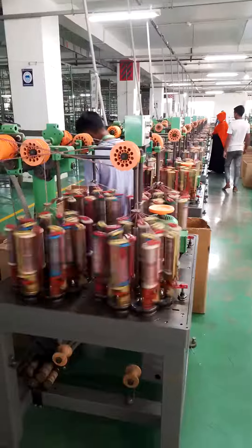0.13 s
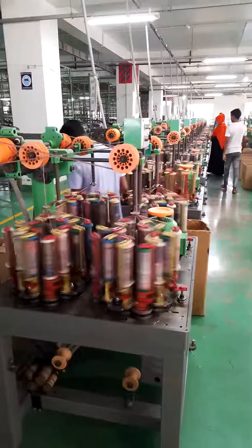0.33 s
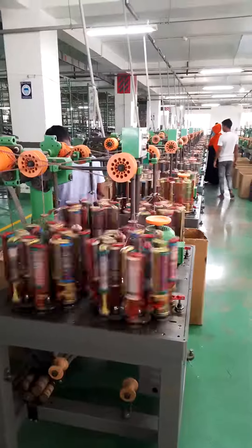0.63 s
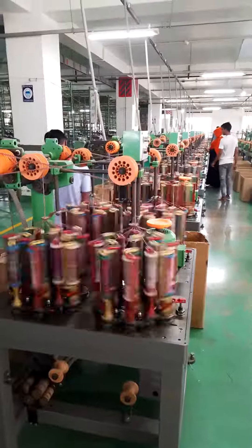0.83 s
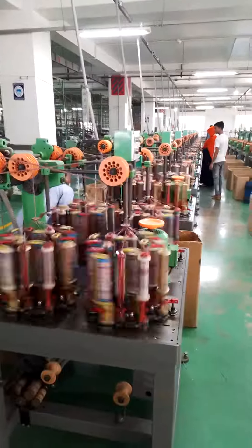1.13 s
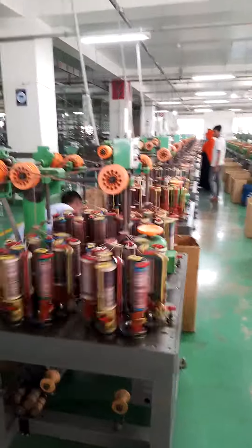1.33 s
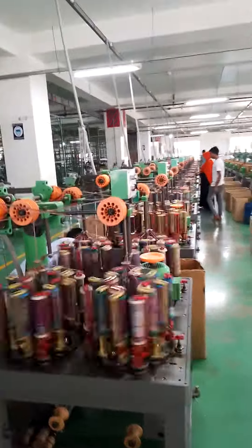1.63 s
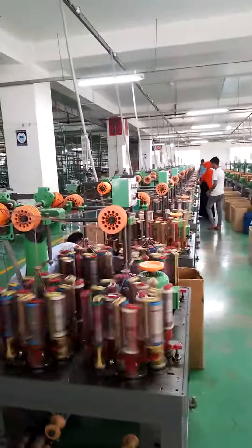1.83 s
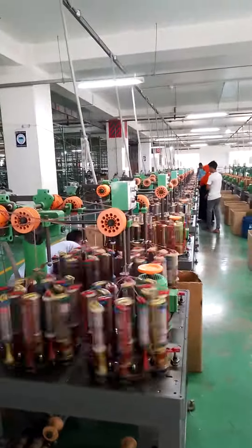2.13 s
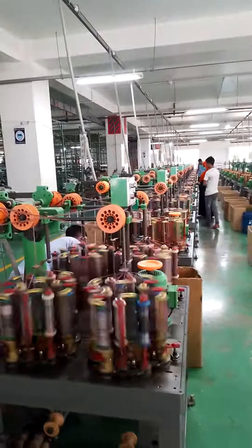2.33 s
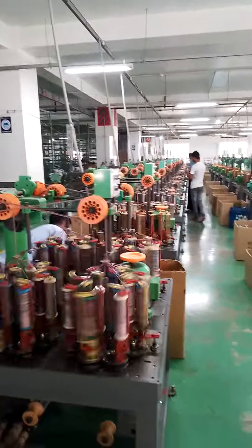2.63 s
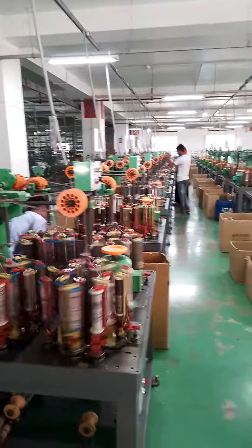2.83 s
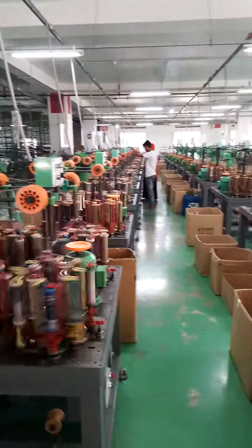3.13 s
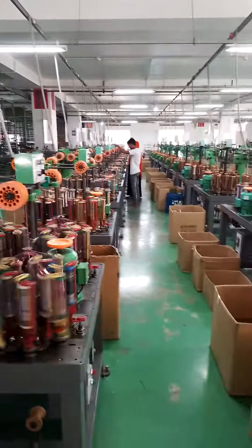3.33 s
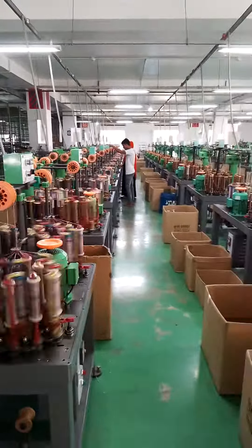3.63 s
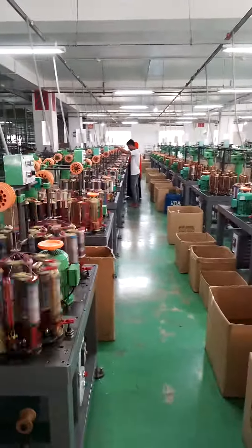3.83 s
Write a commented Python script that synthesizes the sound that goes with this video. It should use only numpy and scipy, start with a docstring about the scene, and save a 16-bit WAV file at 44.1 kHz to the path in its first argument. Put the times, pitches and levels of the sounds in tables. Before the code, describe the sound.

Braiding machines roar in a dense steady clatter across a large factory hall, after brief silence.

```python
"""A long hall full of braiding machines, heard by a phone with two microphone ports.
After a silent start the sound fades in: thousands of bobbin carriers clatter into one dense roar, made
as shaped noise; gear meshes and motors hum in close, beating families of sines; the nearest machine adds
a faint rhythm of short noise clacks, which weakens at about three seconds as the phone turns away."""
import sys
import numpy as np
from scipy import signal
from scipy.fft import rfft, irfft
from scipy.io import wavfile
from scipy.ndimage import uniform_filter1d

SR = 44100
rng = np.random.default_rng(int(sys.argv[2]) if len(sys.argv) > 2 else 0)


def store_pcm(level_fs):
    """Save levels as 16-bit WAV."""
    pcm = np.round(np.clip(level_fs, -1, 1) * 32767).astype(np.int16)
    wavfile.write(sys.argv[1], SR, np.atleast_2d(pcm).T)


def gain_from_decibels(decibels):
    """Convert decibel values to linear amplitude factors."""
    exponent = np.asarray(decibels, float) / 20
    return 10 ** exponent


N = 176400  # samples: 4 s


def read(points, hz):
    """Logarithmic frequency scale: interpolates a table's values along it."""
    f, value = np.transpose(points)
    return np.interp(np.log(hz + 1), np.log(f + 1), value)


def evened(x):
    """Normalization: scales a signal to rms 1."""
    return x / np.sqrt(np.mean(x ** 2) + 1e-20)


def slow(lo_hz, hi_hz, t):
    """Random-phase superposition: 20 sines between two rates make a slow fluctuation of rms 1."""
    f = np.geomspace(lo_hz, hi_hz, num=20)[:, None]
    phase = 2 * np.pi * (f * t + rng.random(f.shape))
    return evened((np.sin(phase) / np.sqrt(f)).sum(0))


# spectrum of the roar before the ports: (frequency [Hz], relative density [dB per Hz])
ROAR_SPECTRUM = [(25, -42), (60, -27), (100, -21), (130, -15), (160, -34.5), (200, -10), (250, -0.5),
                 (310, 5), (450, 4), (700, 1.5), (1000, 0), (1350, -4), (2100, 0), (3000, -5), (4000, -4),
                 (5200, -4), (7000, -5.5), (9000, -6.5), (10500, -6), (12000, -9.5), (13500, -10.5),
                 (15000, -28.5)]
# likeness of the two ports: (frequency [Hz], left-right correlation [-1 to 1])
LIKENESS = [(60, 1), (98, 1), (160, 0.99), (260, 0.85), (430, 0.6), (710, 0.15), (1160, -0.15),
            (1900, 0.016), (3120, 0.0039), (5100, 0.042), (8360, 0.16), (13700, 0.18)]
ROAR_DB = -23  # rms before the ports
PATCH_DB, FLICKER_DB = 0.5, 0.25  # rms level swings


def roar():
    """Diffuse field: the hall blurs all the far machines into partly correlated, slightly flickering noise."""
    frames, hz = N // 512 + 5, np.fft.rfftfreq(2048, 1 / SR)
    a, b, c, d, patches = rng.standard_normal((frames, 1025, 5)).T
    # patches span 24 frequency bins and 6 frames, alike at both ports
    patches = uniform_filter1d(patches, size=24, axis=0)
    patches = evened(uniform_filter1d(patches, size=6, axis=1))
    flicker = slow(4, 30, np.arange(frames) * 512 / SR)
    likeness = np.clip(read(LIKENESS, hz), -1, 1)[:, None]
    left, independent = a + 1j * b, c + 1j * d
    right = likeness * left + np.sqrt(1 - likeness ** 2) * independent
    level_db = read(ROAR_SPECTRUM, hz)[:, None] + PATCH_DB * patches + FLICKER_DB * flicker
    spectrum = np.array([left, right]) * gain_from_decibels(level_db)
    noise = signal.istft(spectrum, nperseg=2048, noverlap=1536)[1][:, :N]
    return gain_from_decibels(ROAR_DB) * evened(noise)


# gear and motor families: fundamental frequencies [Hz]
FUNDAMENTAL_HZ = [299.1, 95.7, 345.5, 347.4, 349.6, 340.8, 294.7, 75.4, 111]
# partials of each family: (rms waver of the fundamental [Hz],
# [(multiple of the fundamental, rms level [dB], left over right [dB], left lead in phase [rad])])
FAMILIES = [(0.25, [(1, -33, -0.5, .1)]), (.4, [(1, -62, -2.5, .1), (2, -57, -4, .1), (4, -42.5, 6, .1),
            (5, -44.5, 1, .3)]), (0.21, [(1, -44, -8, .1), (2, -45.5, -14, 0.41), (3, -51.5, -4, 0.84)]),
            (0.198, [(1, -46, 9, .1), (2, -52.5, -14, 0.55)]), (0.19, [(1, -53.5, 8, .1),
            (2, -43, -4.5, 1.5), (3, -58, 5, 1.1), (4, -49, 2, 1.3)]), (0.18, [(1, -52, .1, .1),
            (2, -52, 8, 0.73)]), (0.18, [(1, -55.5, 5, .1)]), (0.26, [(1, -74, -6, .1)]),
            (1.5, [(1, -66.5, 2, .1)])]
HUM_WOBBLE_DB = 1.3  # rms level swing of each partial


def hums():
    """Harmonic series and beats: each gear or motor family shares a wavering speed; each partial wobbles."""
    t = np.arange(N) / SR
    coarse = np.arange(0, N + 200, 200) / SR  # time grid of the slow changes
    side = np.array([[.5], [-.5]])  # left, right
    out = np.zeros((2, N))
    for fundamental_hz, (waver_hz, partials) in zip(FUNDAMENTAL_HZ, FAMILIES):
        waver = np.interp(t, coarse, slow(0.304, 2.7, coarse))
        turn = 2 * np.pi * np.cumsum(fundamental_hz + waver_hz * waver) / SR
        for multiple, db, pan_db, lead in partials:
            wobble = np.interp(t, coarse, slow(1.5, 10, coarse))
            level_db = db + HUM_WOBBLE_DB * wobble + side * pan_db
            phase = round(multiple) * turn + side * lead + 2 * np.pi * rng.random()
            out += np.sqrt(2) * gain_from_decibels(level_db) * np.sin(phase)
    return out


# the carriers cross four times per horn-gear turn: (relative strength of each crossing [dB])
CROSSINGS = [0, -4, -9, -8]
# spectrum of one clack: (frequency [Hz], relative level [dB])
CLACK_SPECTRUM = [(600, -30), (2000, -7.5), (4000, -1.5), (8000, -4), (14000, -3.5)]
# near machine at each port as the phone turns away: (time [s], left level [dB], right level [dB])
NEAR_LEVEL = [(.4, -33, -35), (1.2, -33, -35), (1.8, -32, -35), (2.4, -32.5, -35), (2.9, -33.5, -34.5),
              (3.2, -38, -36), (4, -38, -36)]
TURNS_PER_S, FIRST_TURN_S = 9.2, -.012
CLACKS_PER_S = 4000  # mean rate at each port
CROSSING_S, CLACK_T60_S = .02, .03  # shower decay to 1/e, clack decay by 60 dB
CLACK_SPREAD_DB = 3.5  # scale of the chance differences between crossings


def carriers():
    """Shot noise: the near machine showers small metal clacks, thrown hardest just after each crossing."""
    t = np.arange(N) / SR
    crossings_per_s = TURNS_PER_S * len(CROSSINGS)
    steps = (t - FIRST_TURN_S) * crossings_per_s
    which = np.floor(steps).astype(int)
    since_s = steps % 1 / crossings_per_s
    luck = rng.uniform(-0.89, 1, which.max() + 2)[which + 1]
    crossing_db = np.array(CROSSINGS)[which % len(CROSSINGS)] + CLACK_SPREAD_DB * luck
    shower = gain_from_decibels(crossing_db) * np.exp(-since_s / CROSSING_S)
    happens = rng.random((2, N)) < CLACKS_PER_S / SR
    hits = happens * rng.standard_normal((2, N)) * shower

    # eight kinds of clack, each a decaying burst of coloured noise
    kind = rng.integers(0, 8, (2, N))
    decay = gain_from_decibels(-60 * np.arange(2048) / SR / CLACK_T60_S)
    colour = gain_from_decibels(read(CLACK_SPECTRUM, np.fft.rfftfreq(2048, 1 / SR)))
    out = np.zeros((2, N))
    for k in range(8):
        clack = irfft(rfft(rng.standard_normal((2, 2048))) * colour) * decay
        out += signal.oaconvolve(hits * (kind == k), clack, axes=1)[:, :N]
    s, left_db, right_db = np.transpose(NEAR_LEVEL)
    level_db = np.array([np.interp(t, s, left_db), np.interp(t, s, right_db)])
    return gain_from_decibels(level_db) * evened(out)


def scene():
    """Superposition: hall roar, hums and the near machine add linearly."""
    return roar() + hums() + carriers()


# microphone ports, left then right: (resonance [Hz], sharpness Q, gain [dB])
PORT_CAVITIES = [(7294, 5.73, 2), (10540, 6.05, 0.5)]
# treble trim of the left channel: (frequency [Hz], gain [dB])
LEFT_TRIM = [(4000, -0.5), (7000, .5), (9500, 0.7), (12000, 1), (13000, 2.5), (14200, 7)]


def through_ports(sound):
    """Cavity resonance: each port is a damped second-order system; a trim raises the left's top treble."""
    hz = np.fft.rfftfreq(N, 1 / SR)
    response = np.array([gain_from_decibels(db) / (1 - (hz / f) ** 2 + 1j * hz / f / sharpness)
                         for f, sharpness, db in PORT_CAVITIES])
    response[0] *= gain_from_decibels(read(LEFT_TRIM, hz))
    return irfft(rfft(sound) * response, N)


# fade-in after silence: (time [s], gain [0 to 1])
FADE_IN = [(.4075, 0), (.409, .04), (.5, .31), (.6, .58), (.675, 1)]


def faded_in(sound):
    """Amplitude envelope: a gain rising from zero multiplies the sound."""
    return sound * np.interp(np.arange(N) / SR, *np.transpose(FADE_IN))


def band_limit(x):
    """A steep low-pass at the top of the band."""
    return signal.sosfilt(signal.butter(12, 14300, fs=SR, output="sos"), x)


def record(dry):
    """Signal chain: the ports and the left trim filter the sound, then its level fades in."""
    mix = faded_in(through_ports(dry))
    return band_limit(mix)


dry = scene()
out = record(dry)
store_pcm(out)
```